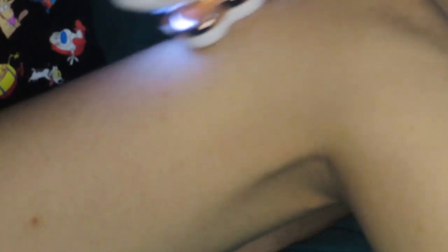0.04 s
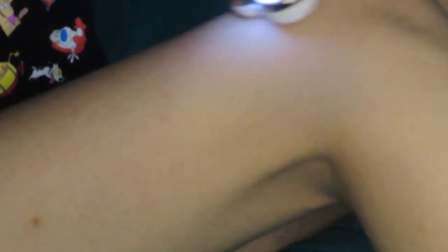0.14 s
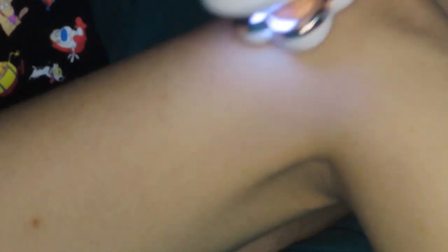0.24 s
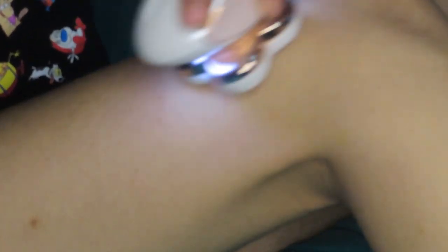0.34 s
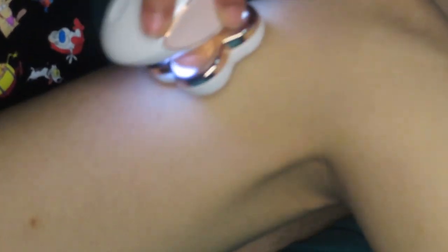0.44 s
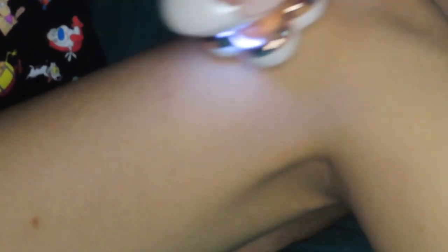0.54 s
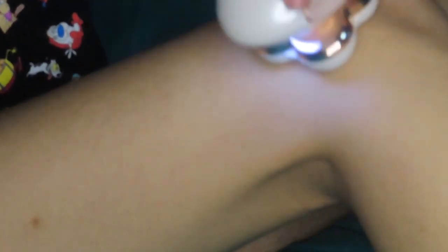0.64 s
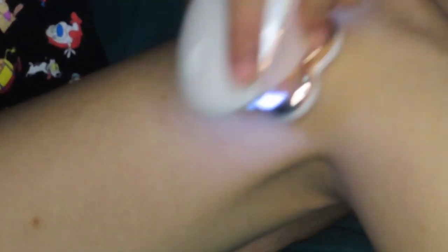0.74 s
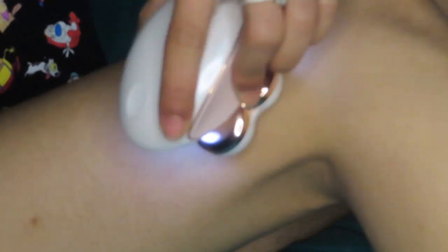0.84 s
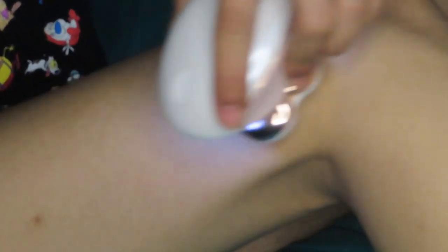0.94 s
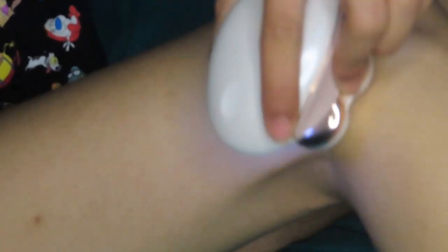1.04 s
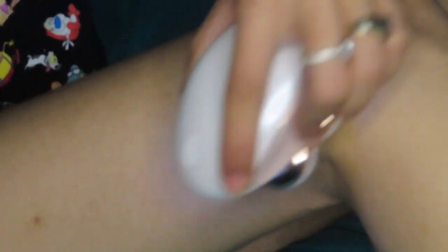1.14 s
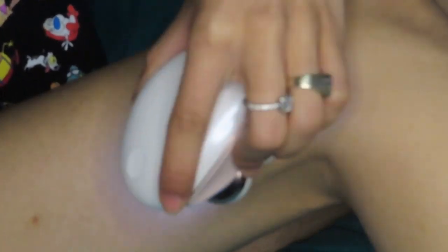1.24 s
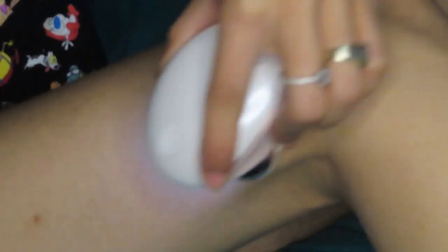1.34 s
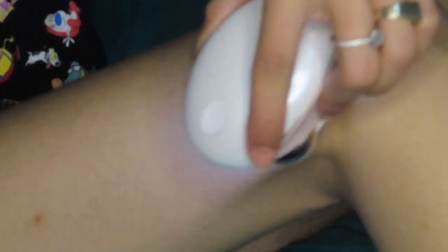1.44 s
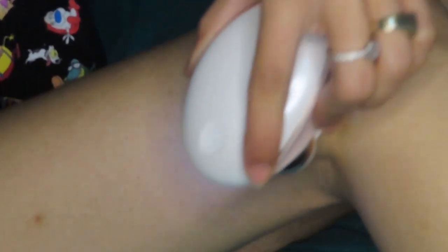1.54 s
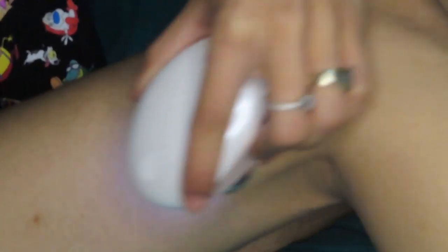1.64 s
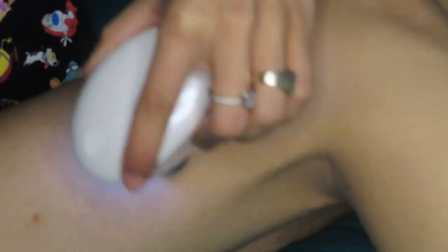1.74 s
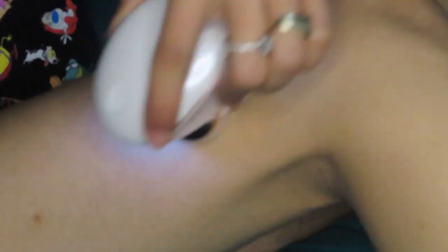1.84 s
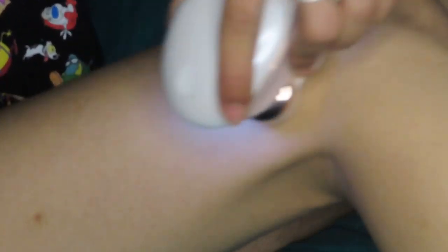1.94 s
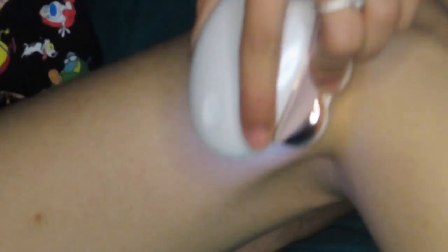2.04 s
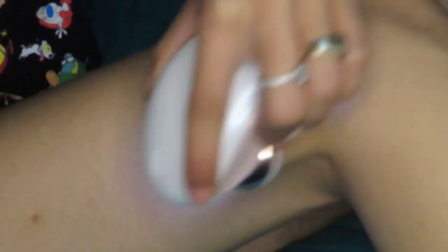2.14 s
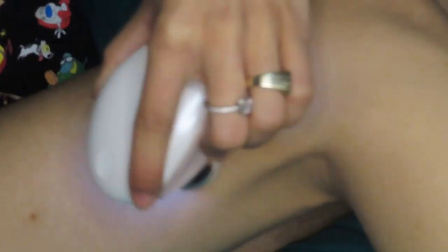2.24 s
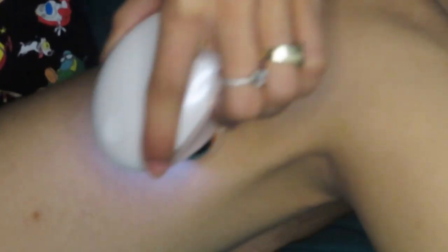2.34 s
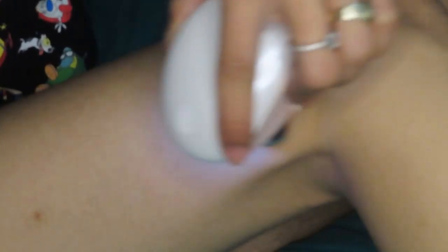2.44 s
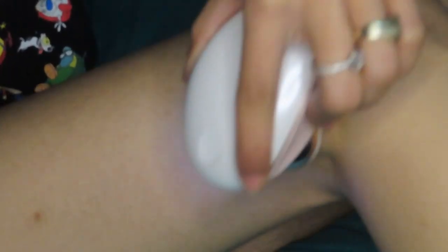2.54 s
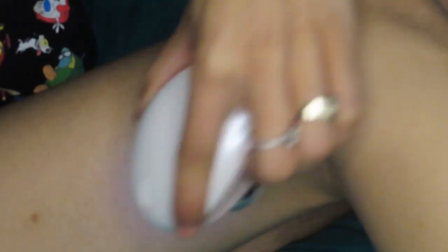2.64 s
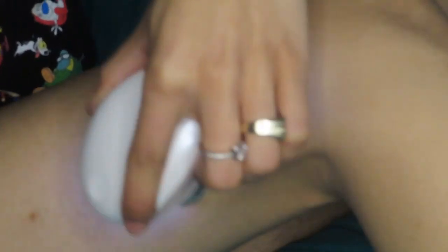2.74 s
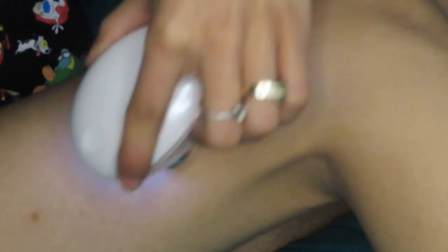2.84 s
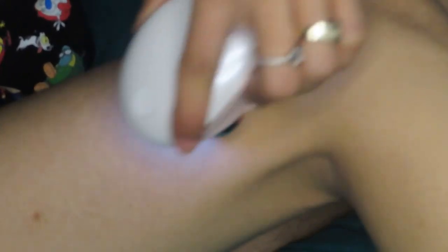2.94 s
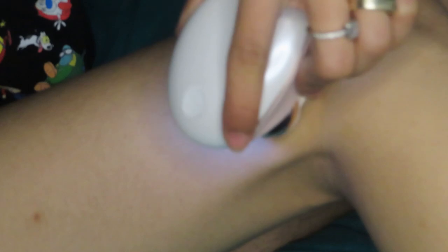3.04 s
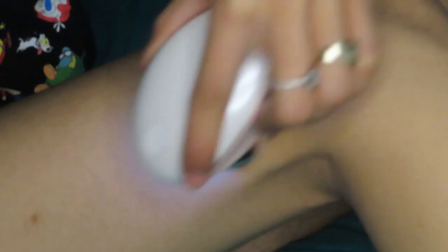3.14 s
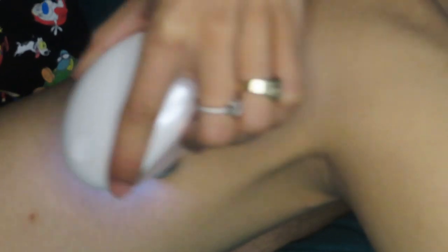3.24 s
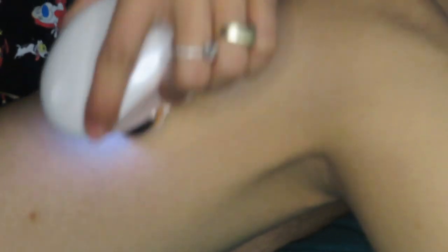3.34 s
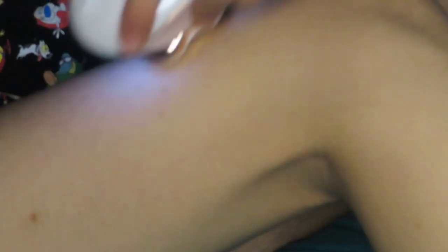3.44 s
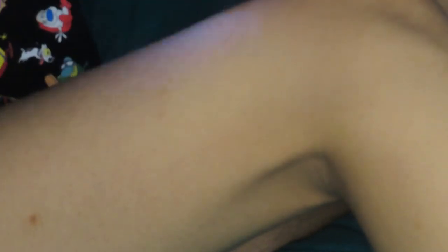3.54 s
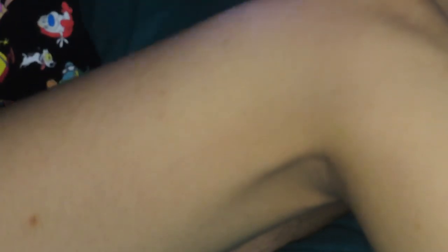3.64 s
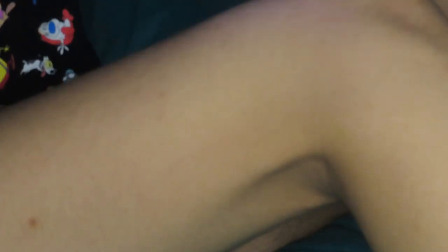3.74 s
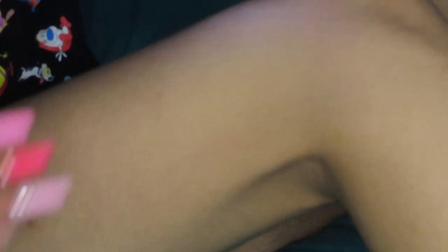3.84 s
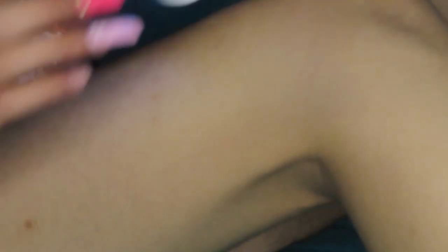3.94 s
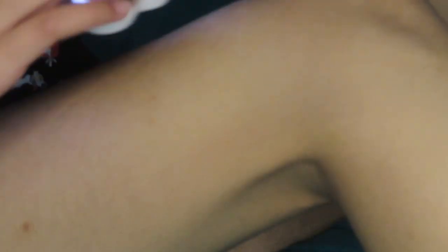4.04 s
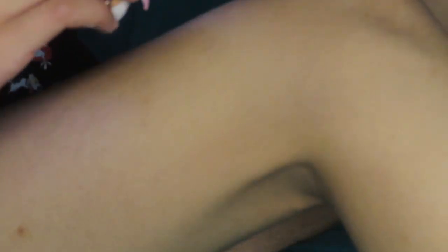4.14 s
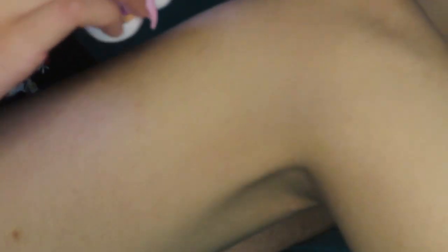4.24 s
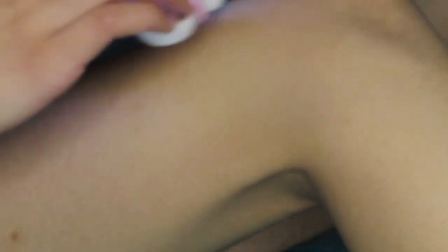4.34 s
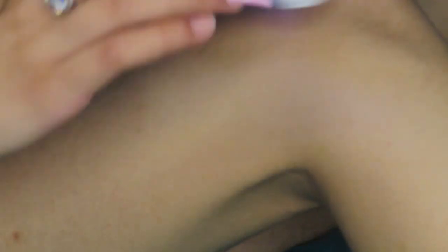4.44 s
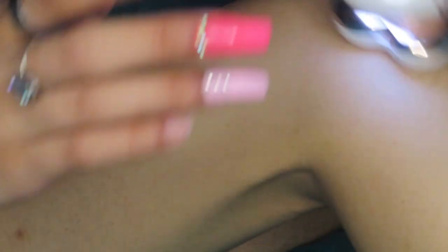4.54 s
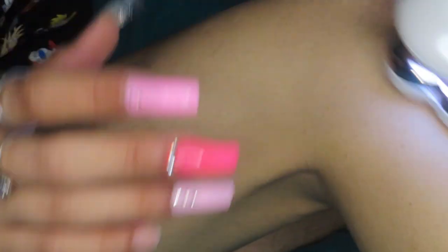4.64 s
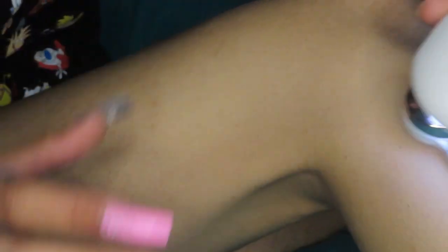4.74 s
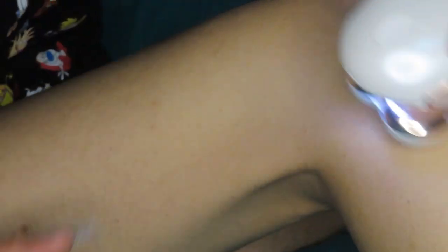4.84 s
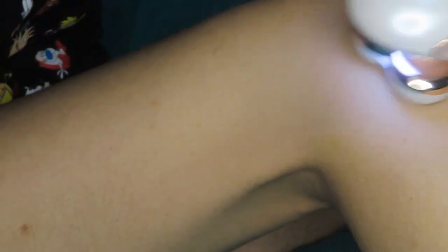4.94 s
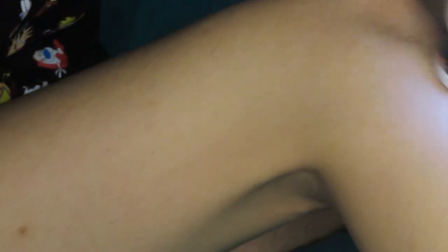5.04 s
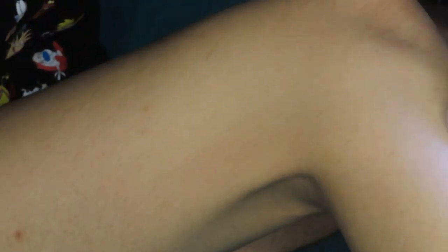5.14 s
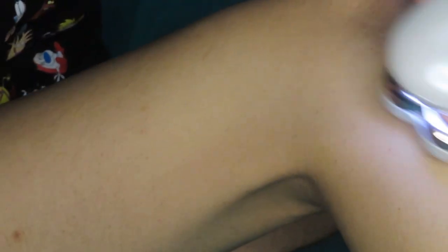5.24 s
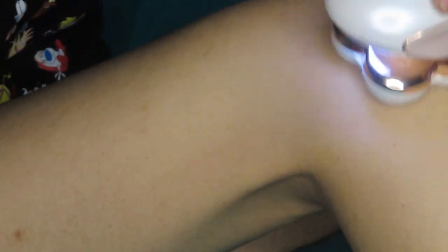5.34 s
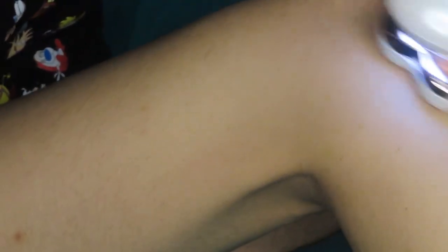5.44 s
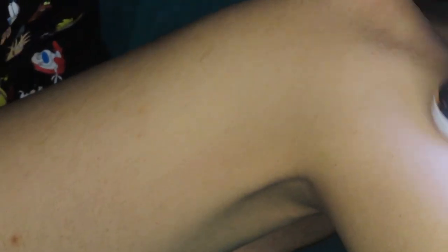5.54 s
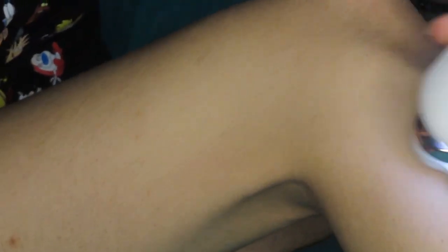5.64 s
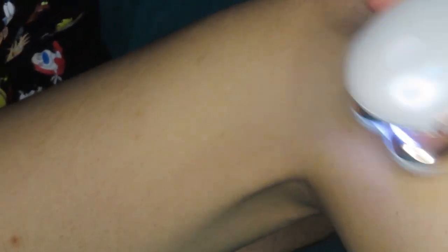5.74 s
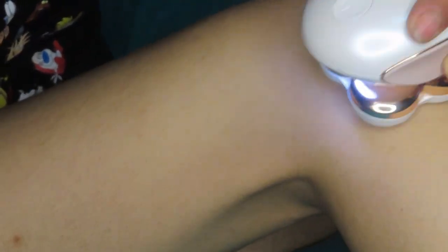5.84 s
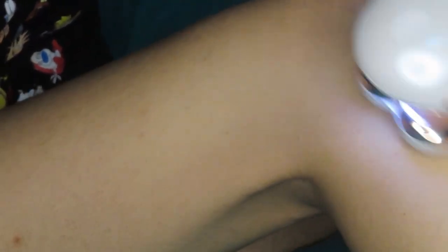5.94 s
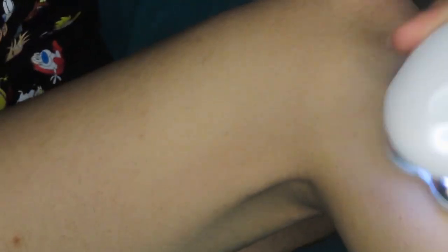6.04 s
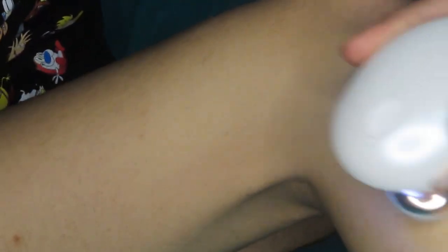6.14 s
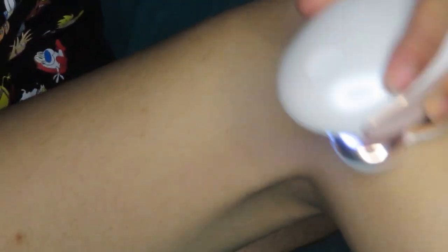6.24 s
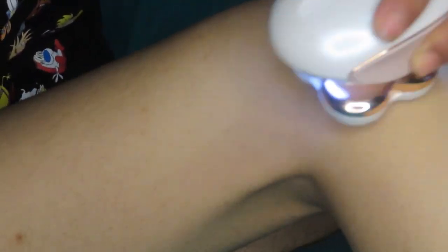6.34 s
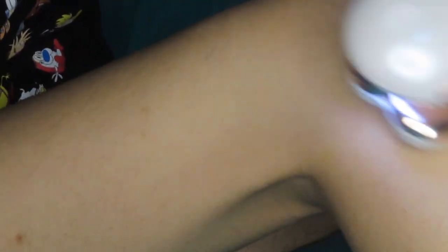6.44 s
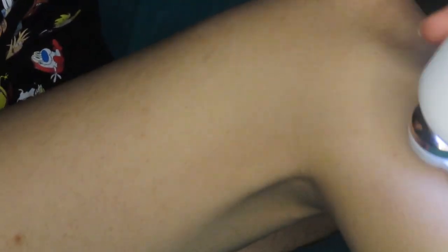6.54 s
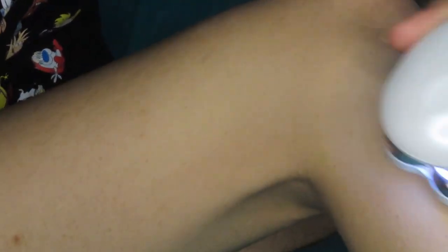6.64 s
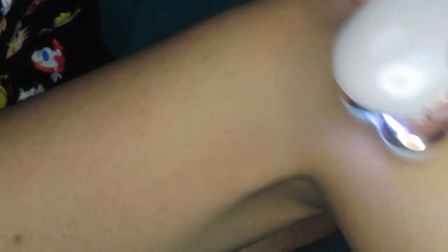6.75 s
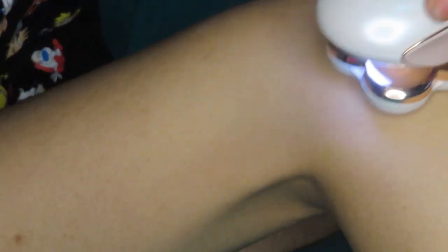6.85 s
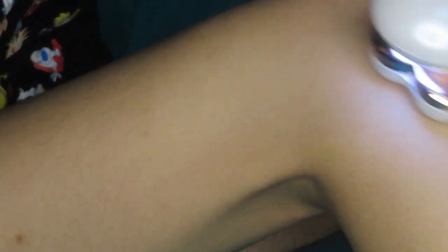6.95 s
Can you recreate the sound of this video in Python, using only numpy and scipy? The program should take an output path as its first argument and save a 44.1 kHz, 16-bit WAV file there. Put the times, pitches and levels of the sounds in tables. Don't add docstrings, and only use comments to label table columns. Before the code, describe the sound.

Close, dry buzz of a little motor with rattling cutters in a plastic shell, already running at the start. Strokes on skin make the tone wander between muffled and bright, with a thin metallic sizzle. Midway it lifts off, speeds up a touch, and one crisp nail click lands on the casing. It then settles back on skin. Behind it are faint room rumble, fan hum and barely audible low pipe moans.

```python
import sys
import numpy as np
from scipy import signal
from scipy.fft import rfft, irfft, next_fast_len
from scipy.io import wavfile
from scipy.ndimage import uniform_filter1d, map_coordinates

SR = 44100
rng = np.random.default_rng(int(sys.argv[2]) if len(sys.argv) > 2 else 0)


def master_out(mix):
    frames = np.transpose(np.atleast_2d(mix))
    ceiling = np.clip(frames, -1, 1)
    pcm = np.round(ceiling * 32767).astype(np.int16)
    wavfile.write(sys.argv[1], SR, pcm)


def boost_factor(decibels):
    exponent = np.asarray(decibels, float) / 20
    return 10 ** exponent


N = 309141
TIME = np.arange(N) / SR
SIZE = next_fast_len(N, True)
FREQ = np.fft.rfftfreq(SIZE, 1 / SR) + 1e-3

# t/s, shaft speed/(turns per s)
SHAFT_SPEED = [(0.0, 68.2), (0.32, 67.95), (0.64, 68.2), (1.05, 68.3), (1.3, 68.0), (2.08, 68.8),
               (2.24, 68.6), (2.88, 69.5), (3.44, 69.0), (3.56, 70.05), (3.84, 70.54), (4.4, 70.8),
               (4.62, 70.6), (4.74, 69.3), (5.12, 69.0), (5.76, 68.36), (6.4, 69.08), (7.01, 68.62)]
LIFT_TIMES = [3.44, 3.6, 4.62, 4.72]
# t/s, length/s, press/dB, lean/dB
PRESSES = [(0.38, 0.51, -3.5, -8.5), (0.78, 0.46, 0, -9.5), (1.1, 0.55, 10, -4), (1.32, 0.34, 4.5, 4),
           (1.42, 0.16, 1, -2.5), (1.6, 0.36, 10.5, -3.5), (2.05, 0.41, 7, -8.5), (2.26, 0.32, 9.5, 2),
           (2.54, 0.34, 12.0, 3.5), (2.83, 0.46, 5.5, 5.5), (3.11, 0.28, 8.5, -4.5), (3.29, 0.42, 3.5, 1.5),
           (4.44, 0.19, 4.5, -1.5), (4.87, 0.15, 1.5, 2.5), (5.34, 0.22, 3.0, -0.5), (5.76, 0.6, 3.5, -1),
           (6.15, 0.43, 7, 5.0), (6.32, 0.18, 0.5, -4), (6.62, 0.22, 7.5, 7.5), (6.86, 0.66, 1.0, -2)]
# t/s, length/s, facing/dB, roll/dB
TURNS = [(0.35, 0.59, 11.5, 7.5), (0.67, 0.34, 10, 3.5), (0.8, 0.29, 8, 5.5), (1.02, 0.3, 6.5, -2),
         (1.53, 0.42, 5.5, 7.5), (1.87, 0.47, 5, 5.5), (2.03, 0.23, 5, 3.5), (2.38, 0.25, 2.5, 5),
         (2.97, 0.73, 2.5, 2.5), (3.1, 0.13, 5.5, 3), (3.64, 0.25, -1, 1), (4.32, 0.5, -1.5, 5),
         (4.7, 0.38, 2.5, 9.5), (4.99, 0.26, 8, -3), (5.43, 0.44, 6, -0.5), (5.9, 0.55, 7, -1),
         (6.33, 0.16, 7, 4), (6.48, 0.22, 8, -3.5), (6.78, 0.17, 7.5, -0.5), (6.92, 0.51, 7.5, 4.5)]
# t/s, level/dB
PALM = [(0.0, -3.2), (0.2, -3), (0.6, -10.5), (1.1, 0.5), (1.7, -10.5), (2.2, -1.5), (2.7, -8.5),
        (3.3, -3.0), (3.6, 5.5), (4.0, -2), (4.4, 4), (4.8, 0.1), (5.2, 7), (5.7, 7.5), (6.2, 0),
        (6.6, 1.5), (7.01, 0.5)]
# low shell, cup low and high, upper shell low and high, mouth, foil low, high and top
# rest level/dB, share of press, of lean, of facing, of roll, lifted level/dB, share of palm
REGIONS = [(-43, 0.36, 0.13, 0.48, 0.2, 2.2, 0.21), (-35.5, 0.29, -0.31, 0.08, -0.87, -3, -0.64),
           (-48, 1.22, 1.1, 1.56, 0.73, 4.5, 0.4), (-40.5, -0.93, 0.91, 0.82, 0.084, 1.5, 0.083),
           (-38.5, 0.24, -0.12, 0.25, -0.035, -3.4, 0.12), (-55.5, 0.044, 0.2, 0.27, -0.19, 9.5, -0.11),
           (-50, -0.09, 0.064, 0.63, -0.02, 0.5, 0.26), (-56, 0.045, -0.39, 0.12, 0.29, 3, 0.14),
           (-54.5, 0.029, 0.26, 0.54, 0.16, 0.5, 0.3)]
# start t/s, end t/s
AWAY_TIMES = [
    (-.3, 0.27),
    (3.47, 4.12),
]
AWAY_LEVELS = [-4, -1.5, -1, -0.5, 0.3, 0.5, -0.5, 1.3, -0.3]
# f/Hz, level/(dB per Hz)
BODY_COLOUR = [(410, -32), (700, -57), (797, -21), (873, -24.5), (1010, -15.5), (1310, -13.5), (1410, -10),
               (1830, -5), (2140, -0.5), (3040, 3.5), (3940, -5.5), (5450, -25.5), (9400, -22),
               (10800, -26), (15600, -29)]
# f/Hz, width/Hz, lift/dB
SHELL_MODES = [(794, 28, 10), (1442, 12, 5.5), (1900, 12, 2.5), (2114, 19, 8), (2269, 41, 5), (2375, 13, 5),
               (2733, 29, 3), (3830, 23, 6.5), (4150, 72, 5.5), (4670, 330, 5), (5700, 26, 9),
               (11800, 820, 3.5)]
# f/Hz, width/Hz, level/dB
OPEN_CUP = (3360, 240, -55)
# t/s, length/s, level/dB
FOIL_FLEXES = [(.35, .3, 1), (.8, .2, 10), (1.05, .25, 11), (1.5, 0.27, 13), (2.02, .3, 9), (2.52, .3, 12),
               (3.1, 0.37, 11.5), (3.55, .2, 8), (3.9, 0.42, 5), (4.35, 0.62, 5), (5.42, .3, 4),
               (6.3, 0.27, 9)]
# f/Hz, width/Hz, rest level/dB
FOIL_RING = (9490, 720, -61.5)
# multiple of shaft speed, level/dB relative to the upper shell
GEAR_WHINE = [(6, -37), (21, -19), (28, -15), (31, -12), (39, -19), (56, -13), (60, -19), (61, -19),
              (84, -33)]
# f/Hz, level/(dB per Hz)
ROOM_AIR = [(12, -34), (20, -1.5), (65, -3), (161, -6.5), (305, -11.5), (433, -9.5), (499, -12),
            (567, -6.5), (720, -10), (792, -7), (900, -5), (1170, -7), (1980, -120)]
# f/Hz, width/Hz, level/dB
HUM = [(55.6, 7.8, -57), (70.2, 4, -60), (119.4, 3.3, -65), (437, 5.9, -65.5), (585, 75, -63)]
# start t/s, end t/s, f/Hz, level/dB
PIPE_MOANS = [
    (0, .35, 228, -58),
    (.42, .74, 227, -53),
    (.9, 1.38, 222, -57),
    (6.82, 6.98, 365, -56),
]
# f/Hz, level/(dB per Hz)
WIDE_COLOUR = [(24, -65), (40, -37), (129, -8.5), (302, -3.5), (1000, -5), (1490, -13), (1820, -7),
               (4050, 0), (5610, -17.5), (9470, -15), (11300, -16), (14100, -19), (15600, -12)]
# t/s, left minus right level/dB
PAN = [(0.0, 0), (1.2, -0.4), (4.0, -0.1), (5.0, -0.9), (7.01, -1.0)]
# f/Hz, level/dB, time to fall 60 dB/s
TAP_MODES = [(1133, -16, 0.043), (1253, -16.5, 0.032), (1510, -21, 0.041), (2080, -5.5, 0.01),
             (2770, 4, 0.0052), (3460, -5, 0.0085), (7430, -10, 0.0056), (8300, -10, 0.0039),
             (10150, -14, 0.0049), (12900, -17, .003), (602, -30.5, 0.015), (5400, -12, .003),
             (404, -30.5, 0.016)]


def level(x, db):
    return x * boost_factor(db) / np.sqrt(np.mean(x ** 2))


def colour(x, gain):
    return irfft(rfft(x, SIZE) * gain, SIZE)[:N]


def shape(points):
    hz, db = np.transpose(points)
    return boost_factor(np.interp(np.log(FREQ), np.log(hz), db))


def bell(hz, width):
    return 1 / np.sqrt(1 + (2 * (FREQ - hz) / width) ** 2)


def follow(points):
    return np.interp(TIME, *np.transpose(points))


def walk(rate):
    hold = int(SR / rate)
    steps = np.repeat(rng.standard_normal(N // hold + 1), hold)
    smooth = uniform_filter1d(uniform_filter1d(steps, hold), hold)
    return 1.282 * smooth[:N]


def strokes(rows):
    start, length, *sizes = np.transpose(rows)
    bells = np.array([np.exp(-.5 * ((TIME - a) / (b / 4)) ** 2) for a, b in zip(start, length)])
    return np.array(sizes) @ bells


def worn_wheel(turns, size=640):
    phases = np.exp(2j * np.pi * rng.random(size // 2 + 1))
    flaws = irfft(phases, size) * np.sqrt(size)
    return map_coordinates(flaws, [turns % 1 * size], order=3, mode="grid-wrap")


def clatter(hz, free):
    wobble = 0.000597 * (1 - free) * walk(12)
    turns = np.cumsum(hz * (1 + wobble)) / SR
    cutter = 3 / 4 * turns
    steady = boost_factor(-4.5 + 2.17 * free)
    teeth = steady * (worn_wheel(turns) + boost_factor(-1.0) * worn_wheel(cutter))
    ticks = (rng.random(N) < 900 / SR) * boost_factor(4.9 * rng.exponential(size=N)) * rng.standard_normal(N)
    loose = rng.standard_normal(N) + level(ticks, -16.0)
    poles = sum(share * np.cos(2 * np.pi * k * turns + k) for k, share in enumerate([.1, .13, .1], 1))
    blades = 0.088 * np.cos(2 * np.pi * cutter) + 0.062 * np.cos(6 * np.pi * cutter)
    gears = (teeth + loose) * (1 + poles)
    cutters = (boost_factor(-2.5) * teeth + loose) * (1 + blades)
    return gears, cutters, turns


def grip_patches(x, held, patchy_db, wide, slow):
    _, at, cells = signal.stft(x, nperseg=1024)
    grip = rng.standard_normal(cells.shape)
    for size, axis in [(wide, 0), (wide, 0), (slow, 1), (slow, 1)]:
        grip = uniform_filter1d(grip, size, axis=axis)
    depth_db = patchy_db * held[np.minimum(at, N - 1).astype(int)]
    return signal.istft(cells * boost_factor(depth_db * grip / grip.std()), nperseg=1024)[1][:N]


def region_levels(free, away):
    controls = [np.ones(N), *strokes(PRESSES), *strokes(TURNS), free, follow(PALM)]
    return np.array(REGIONS) @ controls + np.outer(AWAY_LEVELS, away)


def shell_regions(gears, cutters, levels):
    lifts = [1 + (boost_factor(db) - 1) * bell(f, width) ** 2 for f, width, db in SHELL_MODES]
    body = shape(BODY_COLOUR) * np.prod(lifts, axis=0)
    edges = [1 / (1 + (FREQ / f) ** 20) for f in (1750, 2200, 2550, 3400, 5000, 6050, 8700, 11000)]
    bands = [b - a for a, b in zip([0] + edges, edges + [1])]
    out = 0
    for x, band, db in zip([gears] * 5 + [cutters] * 4, bands, levels):
        out = out + level(colour(x, body * band), 0) * boost_factor(db + 0.9 * walk(14))
    return out


def gear_whine(turns, upper_db):
    out = 0
    for multiple, db in GEAR_WHINE:
        out = out + boost_factor(upper_db + db + 3 * walk(4)) * np.sin(2 * np.pi * multiple * turns)
    return out


def remover():
    free = np.interp(TIME, LIFT_TIMES, [0, 1, 1, 0])
    ramp_s = .12
    away = sum(np.clip(np.minimum(TIME - a, b - TIME) / ramp_s + .5, 0, 1) for a, b in AWAY_TIMES)
    levels = region_levels(free, away)
    gears, cutters, turns = clatter(follow(SHAFT_SPEED), free)
    held = 1 - .6 * free
    gears = grip_patches(gears, held, 1.5, 3, 14)
    cutters = grip_patches(cutters, held, 1.4, 8, 14)
    cup_hz, cup_width, cup_db = OPEN_CUP
    cup = away * free * level(colour(gears, bell(cup_hz, cup_width) ** 2), cup_db)
    foil_hz, foil_width, foil_db = FOIL_RING
    foil = level(colour(cutters, bell(foil_hz, foil_width) ** 2), foil_db)
    foil = boost_factor(strokes(FOIL_FLEXES)[0]) * foil
    upper_db = levels[3:5].mean(axis=0) + 4.5
    return shell_regions(gears, cutters, levels) + cup + foil + gear_whine(turns, upper_db)


def room():
    out = level(colour(rng.standard_normal(N), shape(ROOM_AIR)), -49.0) * boost_factor(1.9 * walk(2.97))
    for hz, width, db in HUM:
        out = out + level(colour(rng.standard_normal(N), bell(hz, width) ** 2), db)
    for start, end, hz, db in PIPE_MOANS:
        swell = np.sin(np.pi * np.clip((TIME - start) / (end - start), 0, 1)) ** .5
        out = out + boost_factor(db) * swell * np.sin(2 * np.pi * hz * TIME)
    return out


def walls(x, t60, gap_s):
    t = np.arange(int(.6 * SR)) / SR
    tail = rng.standard_normal(len(t)) * boost_factor(-60 * t / t60) * (t > gap_s)
    return signal.fftconvolve(x, tail / np.sqrt(np.sum(tail ** 2)))[:N]


def tap():
    tap_s = 4.1239
    out = 0
    for late_s, hit_db in [(0, -0.5), (.0058, -14)]:
        t = np.maximum(TIME - tap_s - late_s, 0)
        rings = sum(boost_factor(db - 60 * t / t60) * np.sin(2 * np.pi * f * t) for f, db, t60 in TAP_MODES)
        crack = boost_factor(-17 - 60 * t / 0.0036) * np.diff(rng.standard_normal(N + 1))
        push = np.sin(np.pi / 2 * np.minimum(t / 0.0014, 1)) ** 2
        out = out - boost_factor(hit_db + 5) * (rings + crack) * push
    return out


def scene():
    buzz, knock = remover(), tap()
    knock_echo = walls(colour(knock, bell(2000, 4500) ** 2), 0.3, 0.0024)
    near = buzz + knock + boost_factor(-7.0) * knock_echo
    pan_db = follow(PAN)
    treble = FREQ ** 8 / (FREQ ** 8 + 1170.0 ** 8)
    white = colour(buzz + boost_factor(-2) * knock, 1 / (shape(BODY_COLOUR) + boost_factor(-60)) * treble)
    diffuse = boost_factor(1.0) * level(walls(white, 0.17, 0.00091), 0) + rng.standard_normal(N)
    side = level(colour(diffuse, shape(WIDE_COLOUR)), -41.5)
    return near * boost_factor(np.array([pan_db, -pan_db]) / 2) + room() + side * np.array([[1], [-1]])


def band_limit(x):
    return signal.sosfilt(signal.butter(12, 16970, fs=SR, output="sos"), x)


def record(dry):
    rounded = np.tanh(.75 * dry) / .75
    top_cut = signal.ellip(12, .2, 70, 15790, fs=SR, output="sos")
    return band_limit(signal.sosfilt(top_cut, rounded))


dry = scene()
out = record(dry)
master_out(out)
```